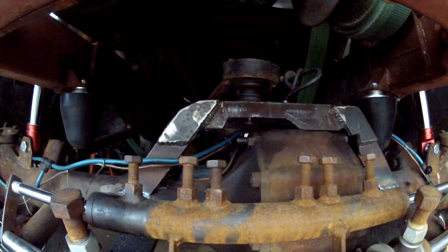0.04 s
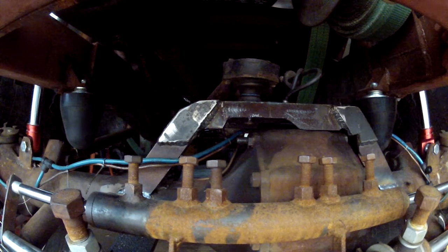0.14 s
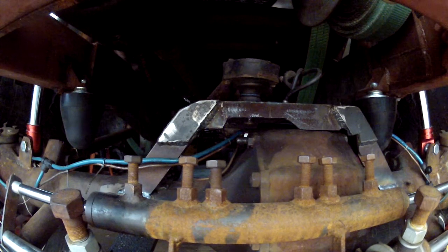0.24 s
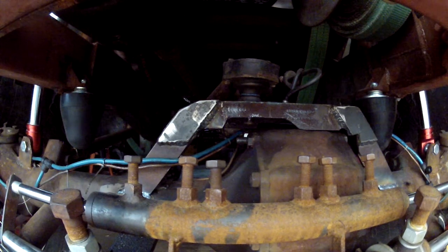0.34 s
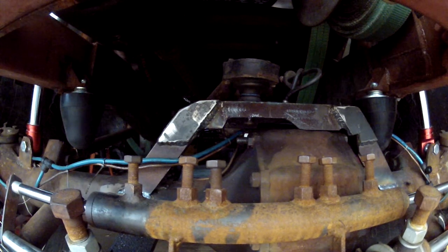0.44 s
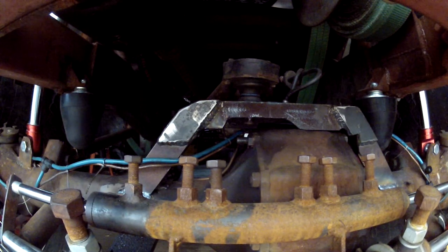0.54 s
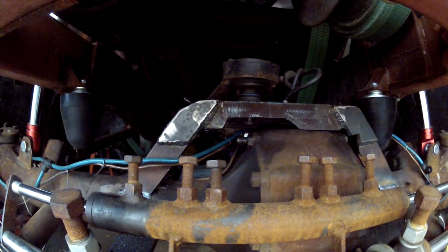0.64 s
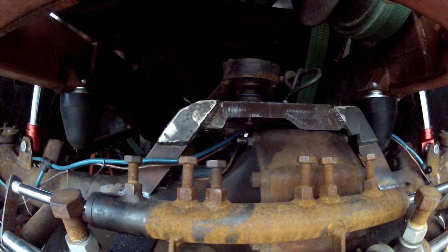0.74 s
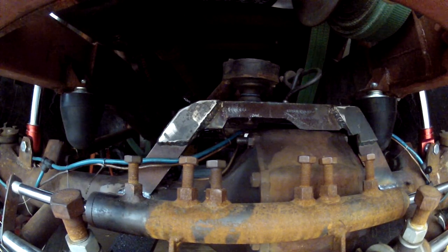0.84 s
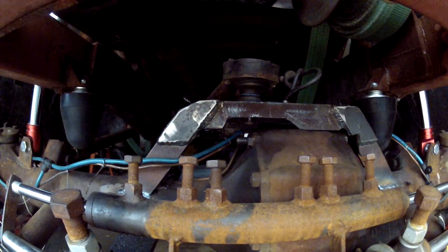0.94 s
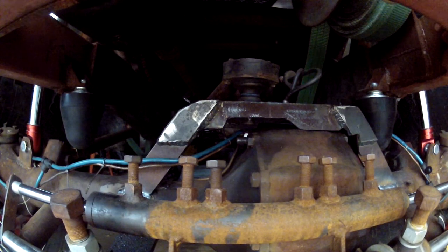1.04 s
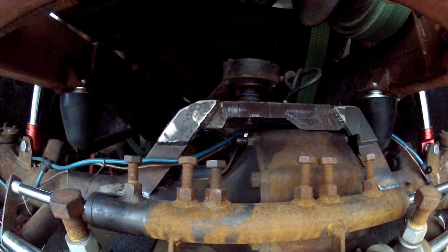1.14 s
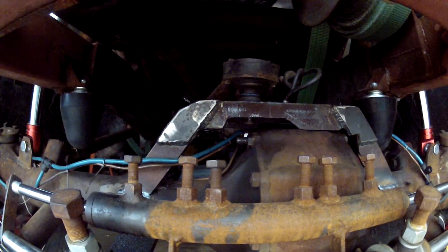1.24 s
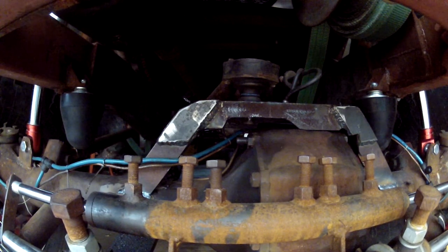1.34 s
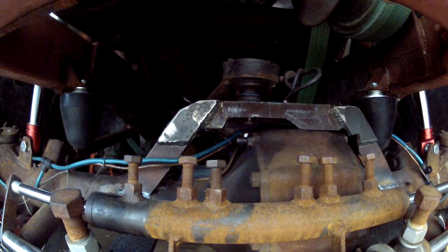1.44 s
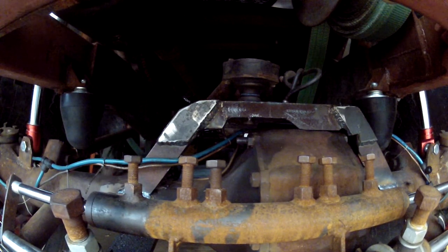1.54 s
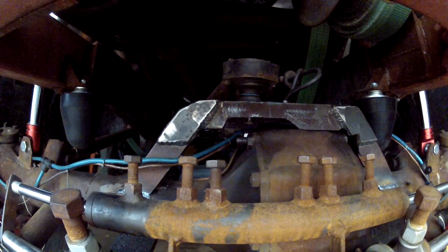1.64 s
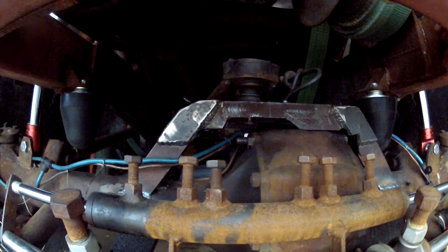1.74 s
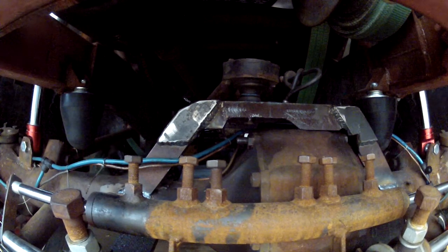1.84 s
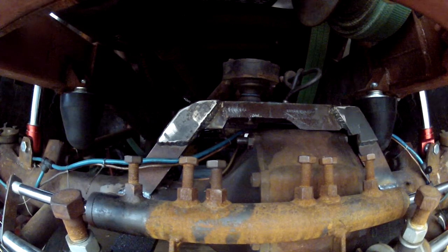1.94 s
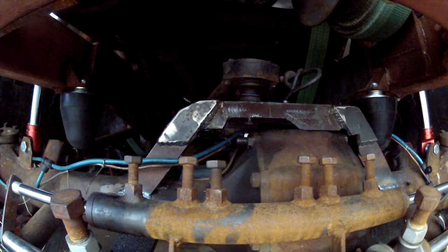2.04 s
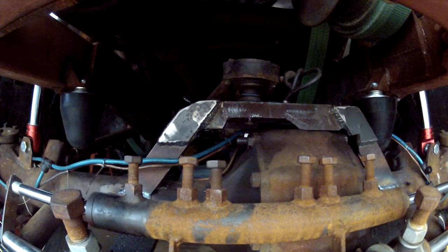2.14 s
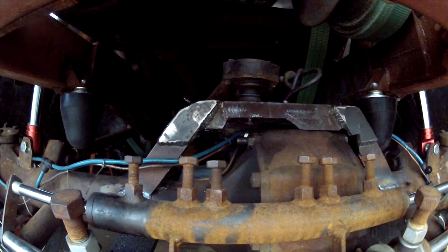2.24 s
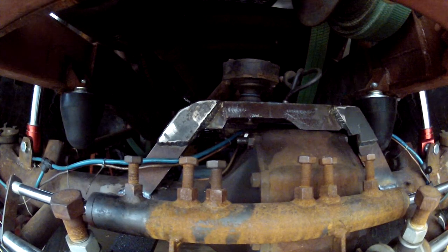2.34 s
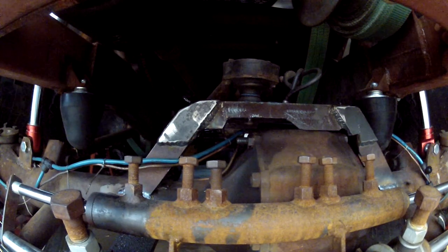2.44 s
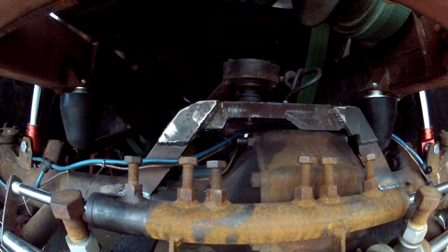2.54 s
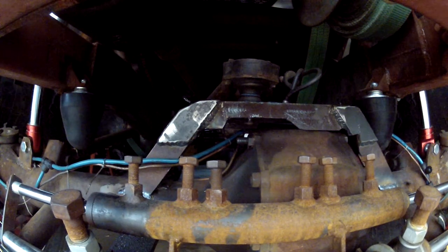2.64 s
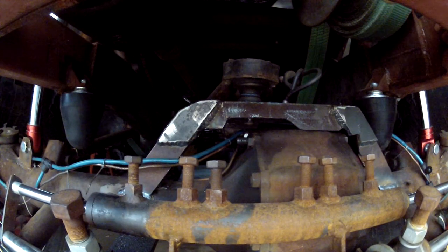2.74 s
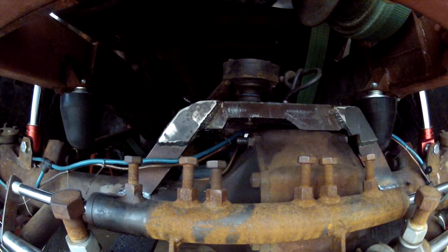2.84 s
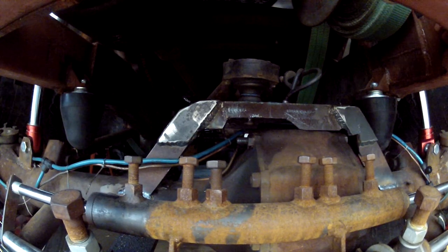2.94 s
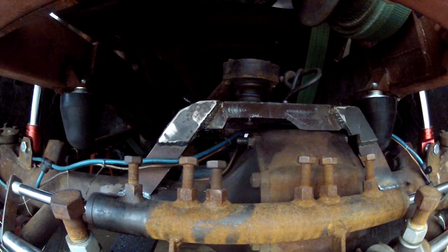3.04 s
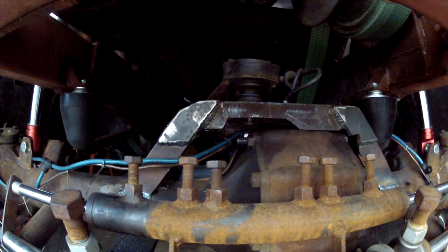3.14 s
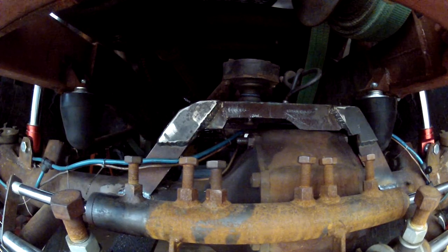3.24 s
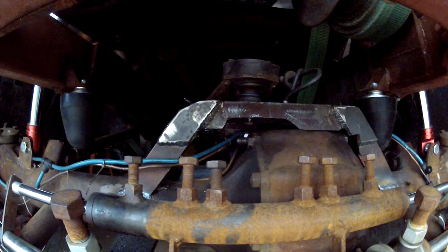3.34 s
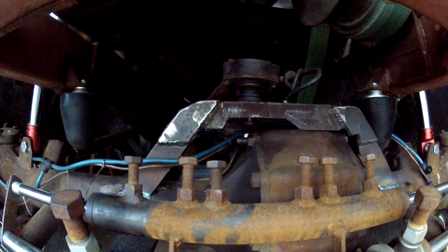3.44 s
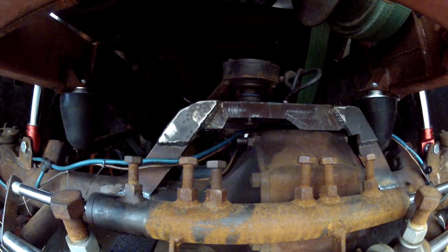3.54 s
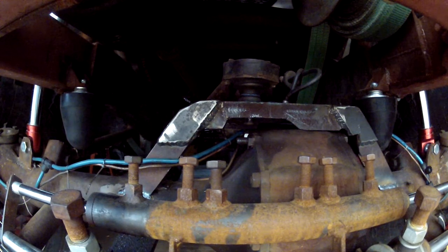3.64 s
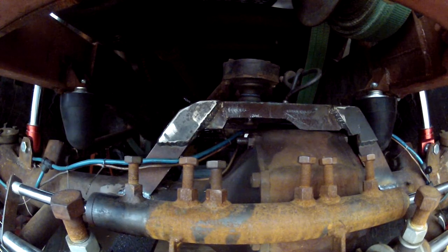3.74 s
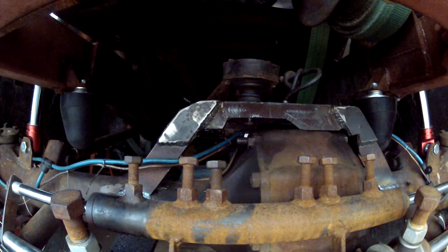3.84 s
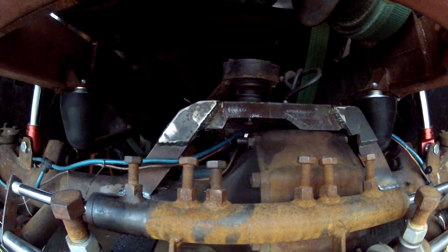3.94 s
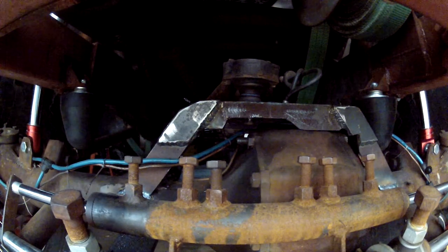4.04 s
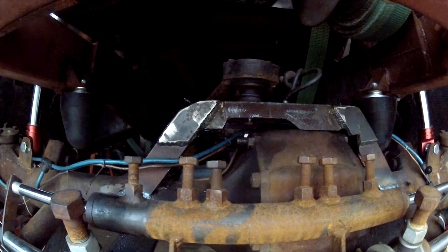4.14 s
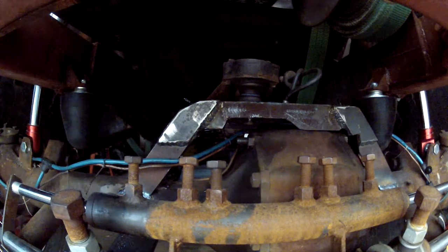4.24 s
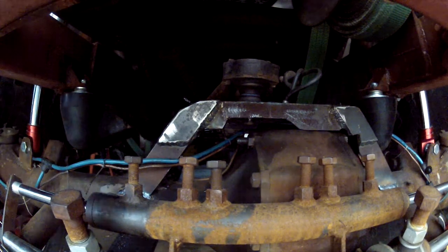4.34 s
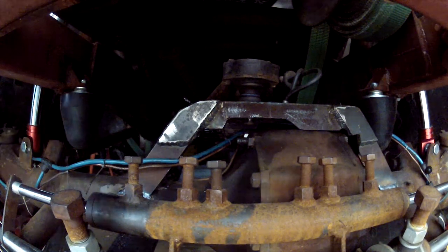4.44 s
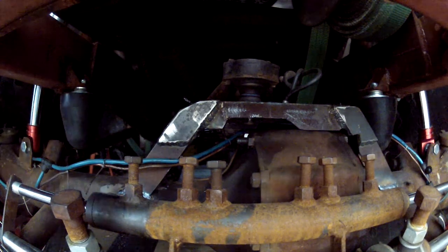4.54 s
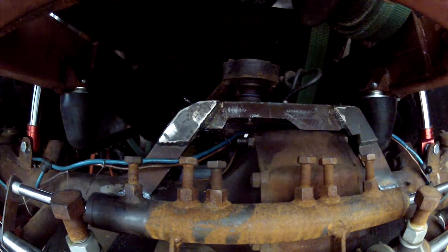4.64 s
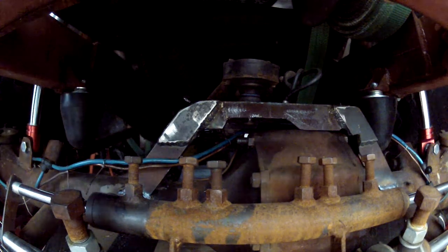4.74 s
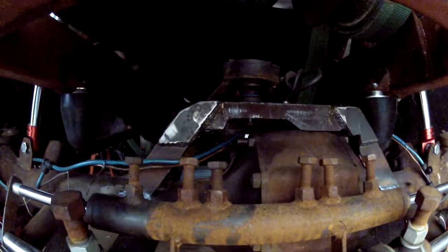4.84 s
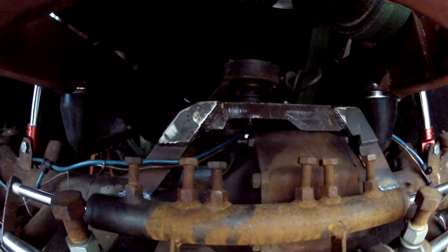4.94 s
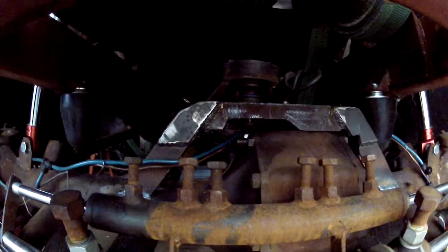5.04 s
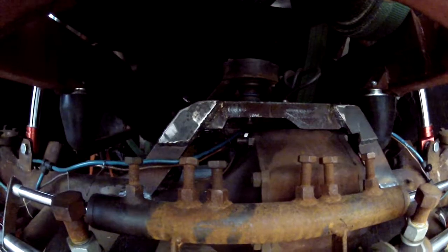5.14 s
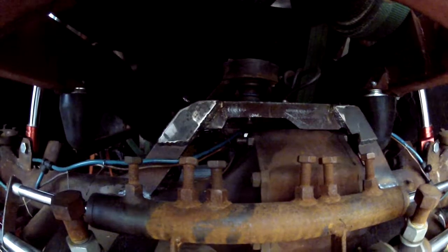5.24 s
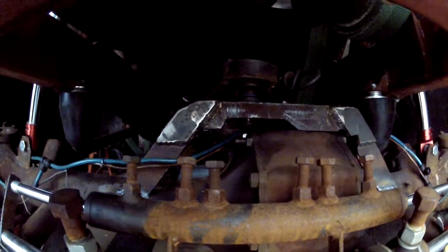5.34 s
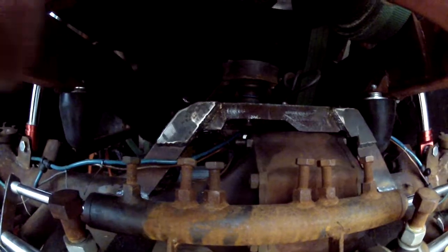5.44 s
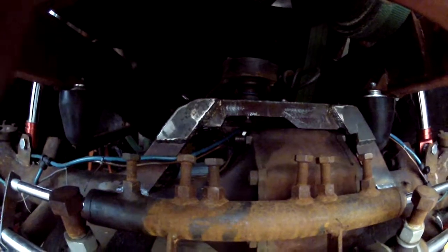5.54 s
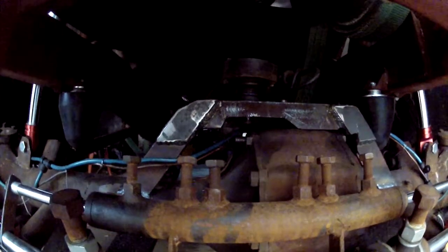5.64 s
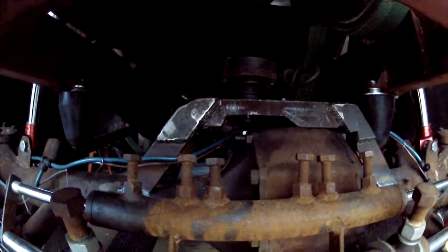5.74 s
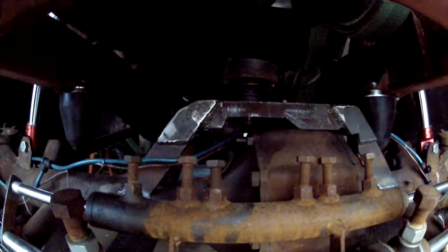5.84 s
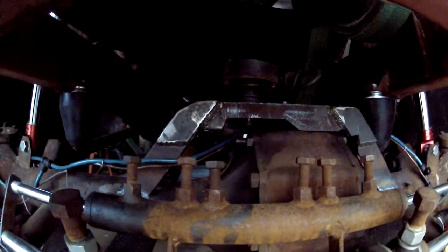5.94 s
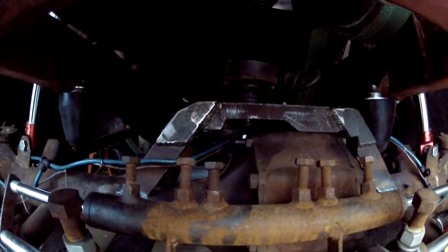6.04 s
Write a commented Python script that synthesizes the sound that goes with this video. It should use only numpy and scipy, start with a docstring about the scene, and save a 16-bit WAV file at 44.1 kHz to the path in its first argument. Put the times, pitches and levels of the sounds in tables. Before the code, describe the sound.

Weak metallic creaks and dull knocks fade into near-quiet with tiny ticks, until harsh, loud grinding scrape bursts in and lasts to the end.

```python
"""A hard, gritty scrape with low bumps, carried straight into a small camera clamped under a vehicle.
It ends the scene: before it the frame groans, knocks and chatters as weight shifts, then dry ticks stand out.
Scrape and chatter are noise ringing resonances, thumps are damped swings; a far motor (wavering sines)
and steady air noise run throughout. The camera samples at 12 kHz and holds each sample, so the treble
mirrors the lower band."""
import sys
import numpy as np
from scipy import signal
from scipy.fft import rfft, irfft
from scipy.io import wavfile
from scipy.ndimage import uniform_filter1d

SR = 44100
rng = np.random.default_rng(int(sys.argv[2]) if len(sys.argv) > 2 else 0)


def materialize(psi):
    """Save the field psi as 16-bit PCM at rate SR to the path in sys.argv[1].

    A 1-D psi becomes a single channel; in a 2-D psi each row is a channel.
    """
    bounded = np.clip(np.atleast_2d(psi).T, -1, 1)
    quanta = np.round(bounded * 32767).astype(np.int16)
    wavfile.write(sys.argv[1], SR, quanta)


N = 268951

# contact pressure of the scrape, heard as grit level: t/s, level/dB
PRESSURE = [(4.862, -18.5), (4.96, -22.5), (5.0, -21), (5.11, -24), (5.22, -29.5), (5.27, -25),
            (5.312, -42), (5.33, -37), (5.385, -20.5), (5.54, -24.5), (5.575, -19), (5.7, -21.5),
            (5.785, -26.5), (5.89, -21), (6.0, -25), (6.045, -40.5), (6.099, -32.5)]
USUAL_PRESSURE_DB = -24
# resonances of the camera housing: f/Hz, width/Hz, level/dB
HOUSING_MODES = [(1160, 280, -9), (1665, 73, -9), (2195, 36, -4), (2300, 200, -7), (2460, 400, -5),
                 (2800, 30, 1), (3573, 63, -1), (3960, 120, -16)]
# weight shifting on the springs: start/s, hold/s, frame groan/dB, axle hum/dB, bracket chatter/dB
WEIGHT_SHIFTS = [(0.0, .13, -48.5, -53.5, -58), (0.34, 0.097, -56, -78, -84),
                 (0.491, 0.015, -43.5, -50, -49.5), (0.603, 0.097, -54.5, -75, -88),
                 (.75, 0.025, -44, -49, -57), (0.786, 0.051, -44, -48.5, -54),
                 (0.913, 0.047, -48.5, -51, -53.5), (0.998, 0.19, -53, -58, -63),
                 (1.21, 0.18, -52, -69, -58), (1.342, 0.06, -41, -46, -53),
                 (1.427, 0.071, -43.5, -52, -52.5), (1.527, 0.087, -48.5, -51, -55.5),
                 (1.59, 0.14, -46, -55, -47.5), (1.76, 0.048, -54, -60, -55), (1.793, 0.034, -48, -60, -60),
                 (1.86, 0.049, -46, -50, -46), (2.081, 0.044, -57, -70, -64), (2.266, 0.033, -57, -72, -65)]
CHATTER_FALL_DB_PER_S = 323


def scrape():
    """Grit drags over metal while the mount hums; sharp catches and low bumps break through."""
    touching = np.arange(N) / SR >= PRESSURE[0][0]
    return (grit() + mount()) * touching + catches() + bumps()


def grit():
    """Dense grains of uneven size drag over metal and ring the housing; harder contact is brighter."""
    # spectrum of the grains: f/Hz, density/(dB per Hz)
    grain_spectrum = [(240, -54), (400, -15), (525, -57), (688, -18), (853, -19), (965, -7.5), (1820, -3.5),
                      (2300, 1), (3380, -6.5), (3660, -4.5), (4440, -11.5), (5200, -11), (5950, -24.5),
                      (7740, -74), (13100, -120)]
    grains_per_s = 9000
    top_db_per_pressure_db = 0.44

    size = gain_of(0.22 * np.minimum(rng.exponential(1, N), 3.0))
    grains = size * (rng.random(N) < grains_per_s / SR) * rng.standard_normal(N)
    grains *= flutter(hz=94.5, depth_db=0.05) * flutter(hz=28.2, depth_db=1.23)
    direct = evened(colour(grains, grain_spectrum))
    rung = evened(ring(grains, HOUSING_MODES, waver_db=4))
    sound = evened(patchy(direct + 0.22 * rung, depth_db=1.57))

    pressure_db, = curves(PRESSURE)
    top = signal.sosfiltfilt(signal.butter(3, 3200, "high", fs=SR, output="sos"), sound)
    top_gain = gain_of(top_db_per_pressure_db * (pressure_db - USUAL_PRESSURE_DB))
    top_gain *= flutter(hz=13.5, depth_db=1.5)
    return gain_of(pressure_db) * (sound + (top_gain - 1) * top)


def mount():
    """The mount passes a lumpy rumble, plus a deep shudder that partly follows the contact pressure."""
    # level of the mount hum: t/s, level/dB
    hum_level = [(4.862, -36.5), (5.1, -42.5), (5.2, -47), (5.38, -45), (5.42, -32), (5.6, -32),
                 (5.64, -45.5), (5.8, -38.5), (5.9, -31), (5.98, -41), (6.099, -51)]
    # spectrum of the hum: f/Hz, density/(dB per Hz)
    rumble_spectrum = [(65, -40), (110, -17.5), (178, 1.5), (254, -8), (333, -13.5), (371, -14.5),
                       (522, -20), (700, -20), (910, -10), (1540, -120)]
    shudder_at_usual_db, pressure_share = -39.5, 0.43

    (hum_db,), (pressure_db,) = curves(hum_level), curves(PRESSURE)
    lumps = rng.standard_normal(N) * flutter(hz=34, depth_db=2.5)
    hum = evened(colour(lumps, rumble_spectrum))
    shudder = evened(signal.sosfilt(signal.butter(1, [8, 40], "band", fs=SR, output="sos"), lumps))
    shudder_db = shudder_at_usual_db + pressure_share * (pressure_db - USUAL_PRESSURE_DB)
    return gain_of(hum_db) * hum + gain_of(shudder_db) * shudder


def catches():
    """Sharp catches in the scrape: short noise puffs, heard directly and ringing the housing."""
    # t/s, peak/dB, centre f/Hz, decay time/s
    catch_rows = [(4.861, -4, 2260, 0.002), (4.879, -12.5, 2370, 0.0074), (4.913, -4, 2350, 0.0034),
                  (4.92, -4.5, 2370, 0.0038), (4.923, -12, 1750, 0.00099), (4.98, -12.5, 2200, 0.019),
                  (5.003, -12.5, 2420, 0.025), (5.326, -17, 2300, 0.035), (5.384, -10.5, 2970, 0.011),
                  (5.427, -13.5, 2470, 0.006), (5.492, -10.5, 3430, 0.0013)]
    return blows(catch_rows, HOUSING_MODES, spread=1.3, rise=0.059, direct=2.1)


def bumps():
    """Bumps and deep single lurches of the mount: damped swings."""
    # bumps during the scrape: t/s, peak/dB, settled f/Hz
    bump_rows = [(4.864, -22.5, 177.6), (4.911, -26, 239), (5.0, -24.5, 164), (5.042, -20, 182),
                 (5.088, -29.5, 244), (4.912, -11.5, 975), (4.913, -31.5, 366), (4.923, -20.5, 1060),
                 (5.402, -30.5, 348), (5.425, -35, 420), (5.467, -19, 180), (5.508, -23, 191),
                 (5.592, -30.5, 197), (5.675, -31, 152), (5.84, -28.5, 159.5), (5.91, -27, 162),
                 (6.07, -38, 175)]
    # deep lurches: t/s, peak/dB, settled f/Hz
    lurch_rows = [(4.922, -16, 70), (5.264, -24, 71), (5.298, -25, 60.5), (5.43, -31, 39),
                  (5.568, -18, 49.1), (5.85, -23, 40), (5.895, -26, 50)]
    lurches = thumps(lurch_rows, cycles=0.33, rise_s=0.0018, sag=0.07)
    return thumps(bump_rows, cycles=3.54, rise_s=0.00092, sag=0.075) + lurches


def frame_and_axle():
    """Uneven slips in the joints ring the frame as groan and the axle, slightly later, as hum."""
    # frame rails: f/Hz, width/Hz, level/dB
    frame_modes = [(202.3, 25, -8), (265.7, 38, 3), (296.5, 41.5, -2), (374, 23, -11), (517, 15.5, -18)]
    # axle: f/Hz, width/Hz, level/dB
    axle_modes = [(105, 100, -8.5), (151, 13, 1), (178.2, 25, 5.5)]
    axle_lag_s = 0.045
    groan_fall_db_per_s, hum_fall_db_per_s = 125, 106

    start_s, hold_s, groan_db, hum_db, _ = np.transpose(WEIGHT_SHIFTS)
    slips = rng.standard_normal(N) * flutter(hz=40, depth_db=3)
    groan = evened(ring(slips, frame_modes, waver_db=2))
    groan *= surges(start_s, hold_s, groan_db, groan_fall_db_per_s)
    hum = evened(ring(slips, axle_modes, waver_db=2))
    hum *= surges(start_s + axle_lag_s, hold_s, hum_db, hum_fall_db_per_s)
    return groan + hum


def knocks():
    """Knocks in the frame: damped swings."""
    # t/s, peak/dB, settled f/Hz
    knock_rows = [(.10, -50, 178), (.322, -47.5, 294), (.368, -47.5, 263), (.485, -42, 258),
                  (.508, -32, 262), (.53, -41.5, 266), (.75, -32, 205), (.792, -31, 277.4),
                  (.83, -40.5, 280), (.93, -45, 180), (.985, -41.5, 252), (1.08, -39, 266),
                  (1.32, -38.5, 264), (1.426, -37, 262), (1.443, -32, 271), (1.47, -49.5, 101),
                  (1.58, -36, 293), (1.611, -35, 271), (1.813, -40, 174), (1.866, -30, 299),
                  (1.869, -35.5, 143), (1.9, -40.5, 480), (2.272, -54.5, 275)]
    return thumps(knock_rows, cycles=5, rise_s=0.0026, sag=0.027)


def brackets():
    """Rattle noise rings light brackets as chatter and a thin rubbing hiss; jolts stand out."""
    # light brackets: f/Hz, width/Hz, level/dB
    bracket_modes = [(720, 24, 3), (959, 42, 10.5), (1152, 68, 12.5), (1440, 22, 10), (1797, 185, 14.5),
                     (1960, 190, 11), (2230, 110, 5.5), (2930, 550, -4), (4620, 1900, -29)]
    # rubbing hiss: f/Hz, width/Hz, level/dB
    rub_modes = [(3790, 100, -8), (3780, 88, -2)]
    # one bush slides: start/s, hold/s, level/dB
    bush_slide = (1.6, 0.13, -64)
    # bracket jolts: t/s, peak/dB, centre f/Hz
    jolt_rows = [(0.031, -54, 1140), (0.087, -44, 1970), (0.1, -57, 800), (0.5, -44, 1800),
                 (0.798, -40, 1600), (0.926, -51, 980), (1.085, -51.5, 1700), (1.347, -37, 1950),
                 (1.443, -38, 1420), (1.871, -53, 1850), (1.886, -41, 1830)]
    rub_re_chatter_db, jolt_decay_s = -21.5, 0.025

    start_s, hold_s, _, _, chatter_db = np.transpose(WEIGHT_SHIFTS)
    rattle = rng.standard_normal(N) * flutter(hz=90, depth_db=1.5)
    shaking = surges(start_s, hold_s, chatter_db, CHATTER_FALL_DB_PER_S)
    chatter = shaking * evened(ring(rattle, bracket_modes, waver_db=3.5))
    slide = surges(*np.transpose([bush_slide]), CHATTER_FALL_DB_PER_S)
    rub = (gain_of(rub_re_chatter_db) * shaking + slide) * evened(ring(rattle, rub_modes))
    jolts = blows(lasting(jolt_rows, jolt_decay_s), bracket_modes, spread=1.13, rise=0.019, direct=1)
    return chatter + rub + jolts


def ticks():
    """Dry ticks of settling grit: noise puffs with no resonance."""
    # t/s, peak/dB, centre f/Hz
    tick_rows = [(2.08, -49.5, 2950), (2.476, -52, 2100), (3.22, -60, 2910), (3.48, -58, 2790),
                 (3.555, -55, 3600), (3.65, -56, 3300), (3.676, -50, 2300), (3.773, -42.5, 1900),
                 (4.16, -56, 2410), (4.27, -59, 3190), (4.33, -58, 1750), (4.421, -52.5, 2000),
                 (4.645, -51.5, 2800)]
    tick_decay_s = 0.023
    return blows(lasting(tick_rows, tick_decay_s), None, spread=1.33, rise=0.071, direct=1)


def motor():
    """Upper harmonics of a far engine; only those near one band carry this far, and they waver."""
    # distant motor: t/s, firing rate f/Hz, level/dB
    motor_rows = [(0, 181, -76), (.8, 186, -77), (2.0, 183, -69), (2.2, 187.5, -72.5), (2.4, 194, -68),
                  (2.62, 191, -72), (2.9, 196, -72.5), (3.2, 188, -71), (3.45, 182.7, -69.5),
                  (3.6, 182.2, -71.5), (4.0, 183, -76.5), (4.5, 189, -73.5), (4.78, 185, -73.5),
                  (6.1, 180, -69)]
    best_hz, carry_width_hz = 2090, 260

    firing_hz, level_db = curves(motor_rows)
    jitter = 0.0017 * evened(uniform_filter1d(rng.standard_normal(N), 2000))
    turns = np.cumsum(firing_hz * (1 + jitter)) / SR
    lines = np.zeros(N)
    for order in range(8, 14):
        carried = np.exp(-0.5 * ((order * firing_hz - best_hz) / carry_width_hz) ** 2)
        lines += carried * flutter(hz=9, depth_db=5.5) * np.sin(2 * np.pi * order * turns)
    return gain_of(level_db) * lines


def air():
    """Steady outdoor hush and microphone hiss: coloured noise with a slight waver."""
    # spectrum: f/Hz, density/(dB per Hz)
    air_spectrum = [(12, -36), (20, -7), (38, -5), (141, -2), (171, -5), (202, 0.5), (227, -6.5), (275, -4),
                    (317, -6), (499, -12.5), (1460, -20.5), (2090, -15.5), (2580, -20.5), (4800, -25),
                    (5950, -31), (7740, -70), (13100, -120)]
    level_db = -59.5
    hush = evened(colour(rng.standard_normal(N), air_spectrum))
    return gain_of(level_db) * hush * flutter(hz=2.9, depth_db=0.47)


def thumps(rows, cycles, rise_s, sag):
    """Each thump is a damped swing of a heavy part, down to 1/e in `cycles`, its pitch sagging as it settles."""
    out, t = np.zeros(N), np.arange(SR // 3) / SR
    for (s, db, hz), sign in zip(rows, rng.choice([-1, 1], len(rows))):
        fade = np.exp(-t * hz / cycles)
        turns = np.cumsum(hz * (1 + sag * fade)) / SR
        swing = (1 - np.exp(-t / rise_s)) * fade * np.sin(2 * np.pi * turns)
        add(out, s, sign * gain_of(db) * swing / abs(swing).max())
    return out


def blows(rows, modes, spread, rise, direct):
    """Each blow is a noise puff around its centre, rising over a share of its decay time; it rings the modes."""
    out, t = np.zeros(N), np.arange(SR // 4) / SR
    for s, db, hz, decay_s in rows:
        u = t / max(decay_s, 5e-4)
        puff = rng.standard_normal(len(t)) * (1 - np.exp(-u / rise)) * np.exp(-u)
        band = signal.butter(2, [hz / spread, hz * spread], "band", fs=SR, output="sos")
        puff = signal.sosfilt(band, puff)
        sound = direct * evened(puff)
        if modes:
            sound = sound + evened(ring(puff, modes))
        add(out, s, gain_of(db) * sound / abs(sound).max())
    return out


def surges(starts_s, holds_s, levels_db, fall_db_per_s):
    """Gain of a layer: each surge rises, then dies away once its hold from the start is over; powers add."""
    rise_s = 0.019
    t = np.arange(3 * SR) / SR
    power = np.zeros(N)
    for s, hold_s, db in zip(starts_s, holds_s, levels_db):
        fall_db = fall_db_per_s * np.maximum(t - hold_s, 0)
        shape = np.clip(t / rise_s, 0, 1) * gain_of(db - fall_db)
        add(power, max(s, 0), shape ** 2)
    return np.sqrt(power)


def ring(x, modes, waver_db=0):
    """Sum of steep double-pole resonances; with waver_db, each is driven with its own wavering strength."""
    out = np.zeros(len(x))
    for hz, width_hz, db in modes:
        r = np.exp(-np.pi * width_hz / SR)
        pole = r * np.exp(2j * np.pi * hz / SR)
        drive = x * flutter(hz=8.9, depth_db=waver_db) if waver_db else x
        rung = signal.lfilter([(1 - r) ** 2], [1, -2 * pole, pole ** 2], drive)
        out += gain_of(db) * 2 * rung.real
    return out


def patchy(x, depth_db):
    """The colour wanders: random patches a few hundred Hz wide and some 40 ms long swell and sink."""
    z = signal.stft(x, nperseg=512, noverlap=384)[2]
    field = uniform_filter1d(rng.standard_normal(z.shape), size=5, axis=0)
    field = uniform_filter1d(field, size=14, axis=1)
    return signal.istft(z * gain_of(depth_db * evened(field)), nperseg=512, noverlap=384)[1][:len(x)]


def flutter(hz, depth_db):
    """Random smooth gain that wavers about hz times a second, rms 1."""
    size = max(int(SR / hz), 1)
    drift = uniform_filter1d(rng.standard_normal(N), size)
    drift = evened(uniform_filter1d(drift, size // 2 + 1))
    return evened(gain_of(depth_db * np.clip(drift, -2, 2)))


def colour(x, points):
    """Shapes x by a spectrum read on a log-frequency axis."""
    hz, db = np.transpose(points)
    shape_db = np.interp(np.log(np.fft.rfftfreq(len(x), 1 / SR) + 1), np.log(hz + 1), db)
    return irfft(rfft(x) * gain_of(shape_db), len(x))


def curves(rows):
    """Columns of a curve table, sample by sample."""
    s, *columns = np.transpose(rows)
    return [np.interp(np.arange(N) / SR, s, c) for c in columns]


def lasting(rows, decay_s):
    """Gives every row the same decay time."""
    return [(*row, decay_s) for row in rows]


def add(mix, s, sound):
    """Lays a sound into the mix at s seconds."""
    part = mix[round(s * SR):][:len(sound)]
    part += sound[:len(part)]


def evened(x):
    """Scales to rms 1."""
    return x / np.sqrt(np.mean(x ** 2) + 1e-20)


def gain_of(db):
    """dB to gain."""
    return 10 ** (np.asarray(db) / 20)


def scene():
    """All sources at the single microphone."""
    chassis = frame_and_axle() + knocks() + brackets()
    return (scrape() + chassis + ticks() + motor() + air())[None]


def record(dry):
    """Samples at a low rate, repeats each sample so mirror bands stay in the treble, then limits the band."""
    hold_hz, repeats, edge_hz = 12000, 4, 15330
    sampled = signal.resample_poly(dry, hold_hz, SR, axis=1)
    held = np.repeat(sampled, repeats, axis=1)
    held = signal.resample_poly(held, SR, hold_hz * repeats, axis=1)[:, :N]
    held = np.pad(held, ((0, 0), (0, N - held.shape[1])))
    band_limit = signal.firwin(1023, edge_hz, window=("kaiser", 9), fs=SR)
    return signal.oaconvolve(held, band_limit[None], "same")


dry = scene()
out = record(dry)
materialize(out)
```